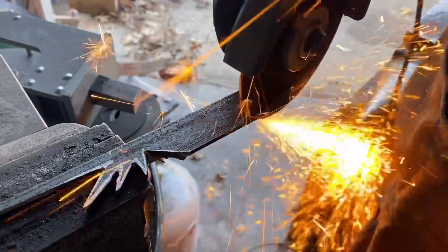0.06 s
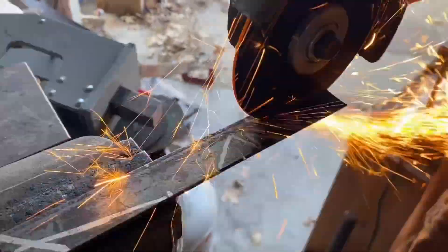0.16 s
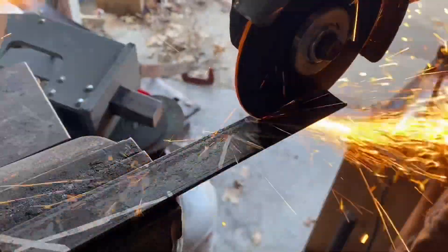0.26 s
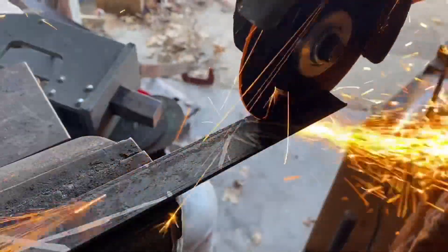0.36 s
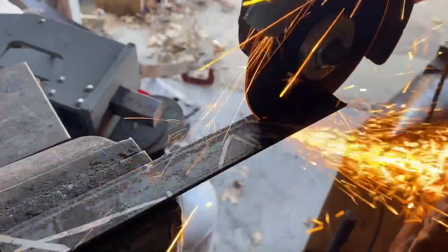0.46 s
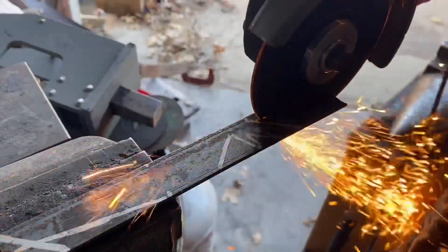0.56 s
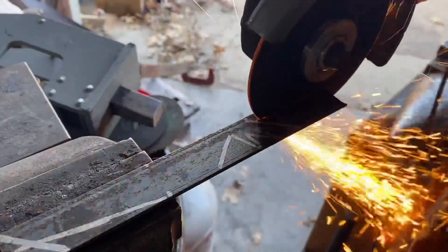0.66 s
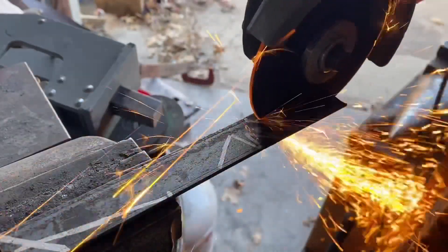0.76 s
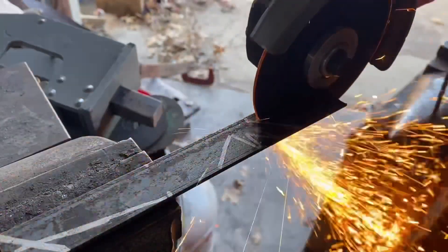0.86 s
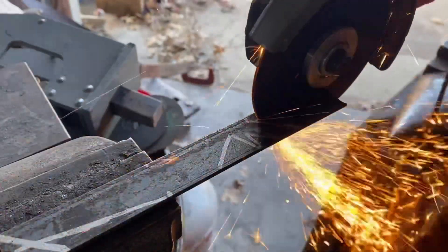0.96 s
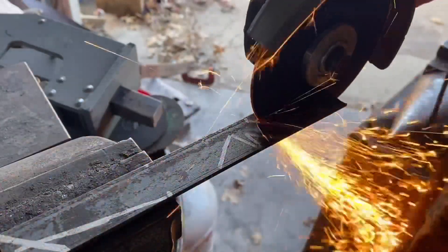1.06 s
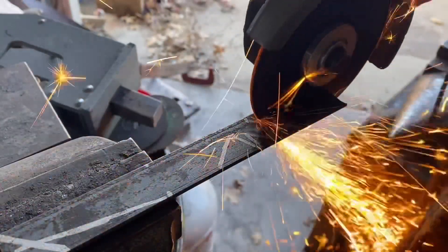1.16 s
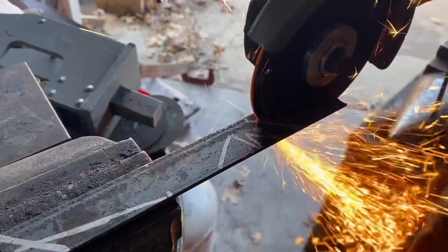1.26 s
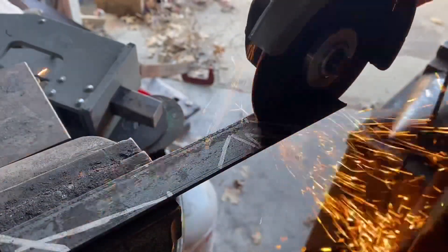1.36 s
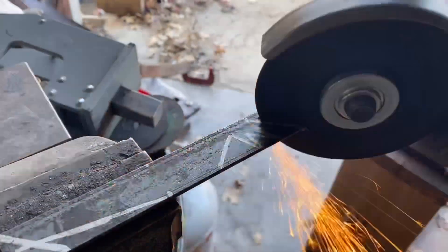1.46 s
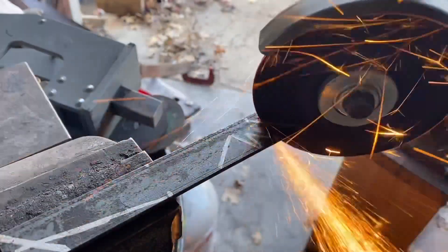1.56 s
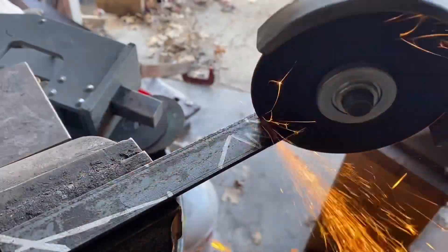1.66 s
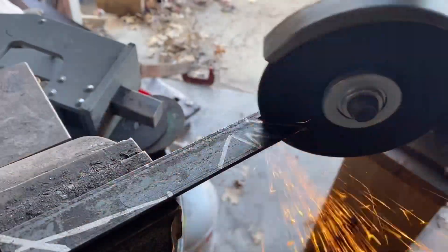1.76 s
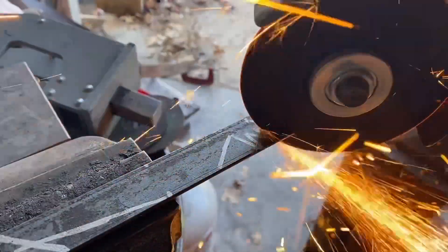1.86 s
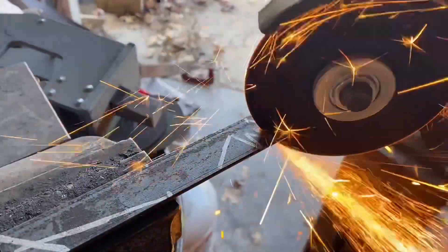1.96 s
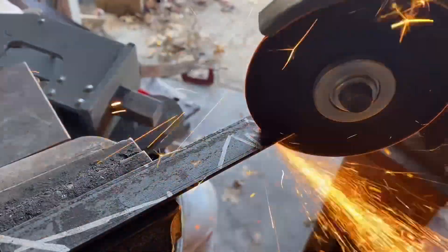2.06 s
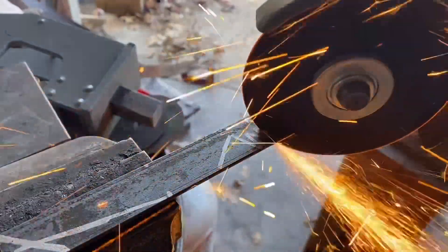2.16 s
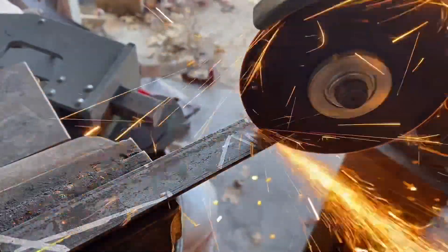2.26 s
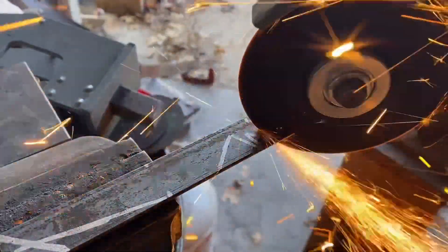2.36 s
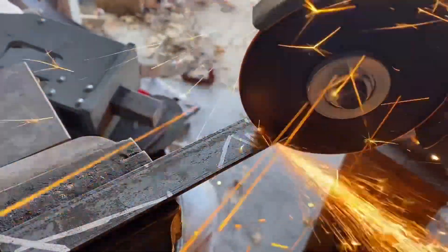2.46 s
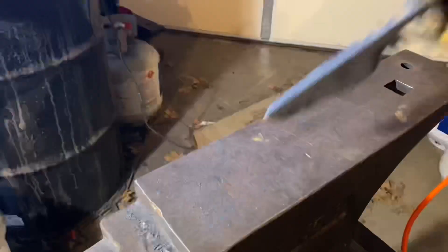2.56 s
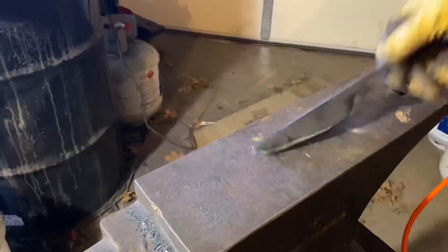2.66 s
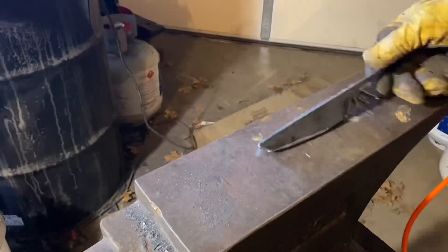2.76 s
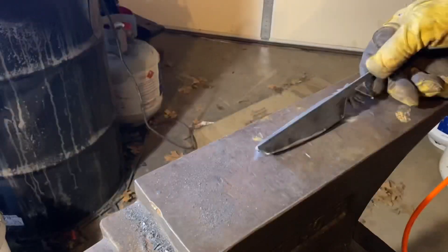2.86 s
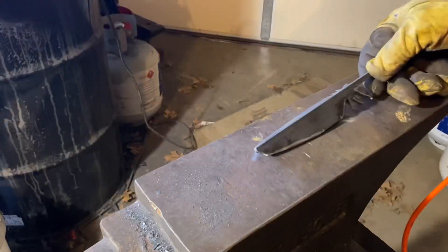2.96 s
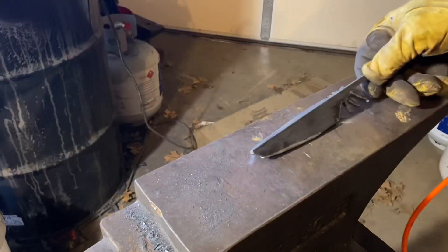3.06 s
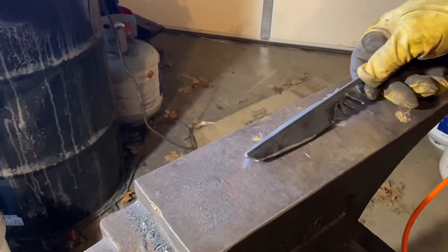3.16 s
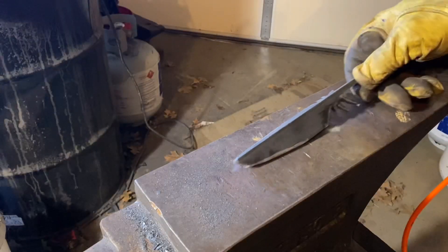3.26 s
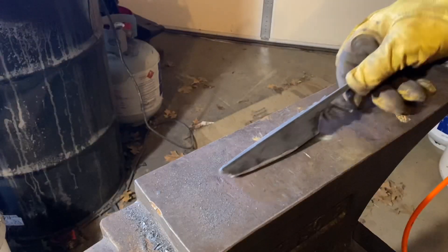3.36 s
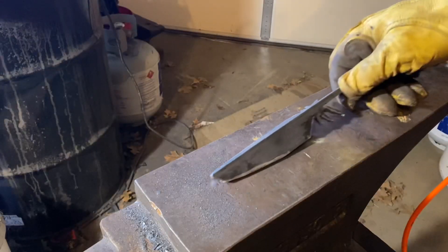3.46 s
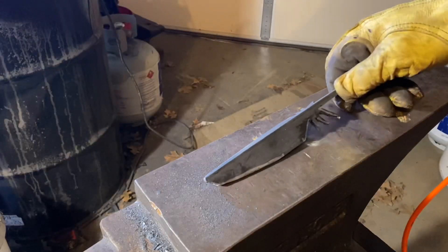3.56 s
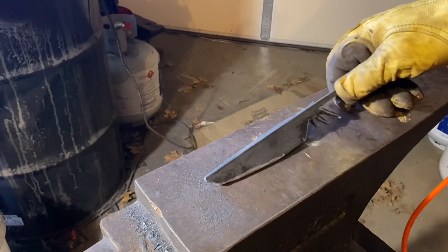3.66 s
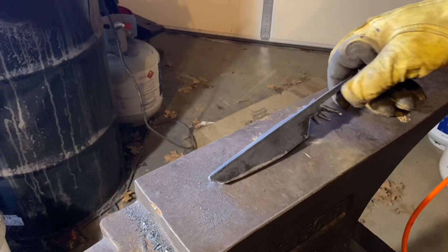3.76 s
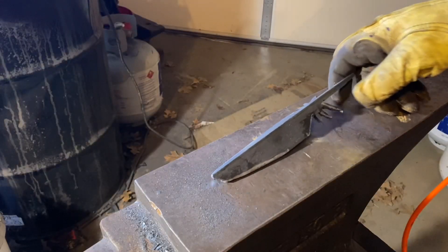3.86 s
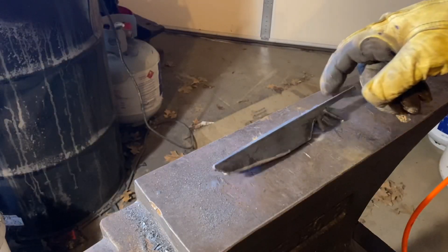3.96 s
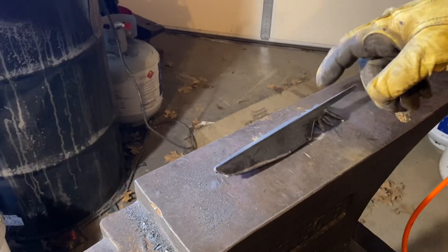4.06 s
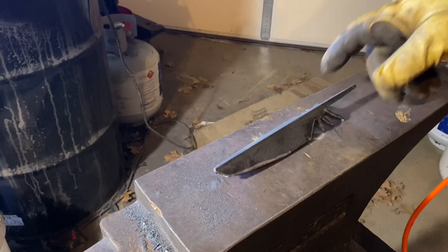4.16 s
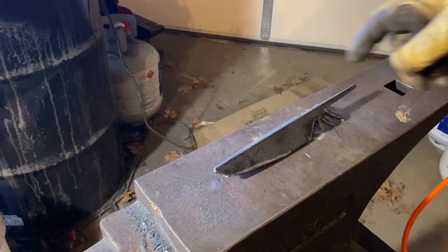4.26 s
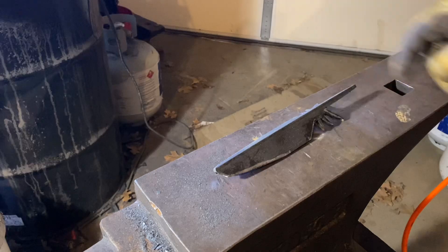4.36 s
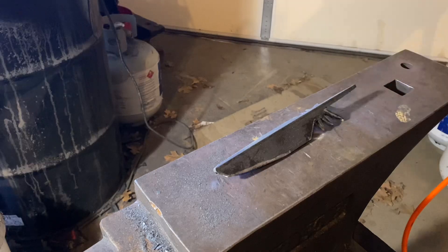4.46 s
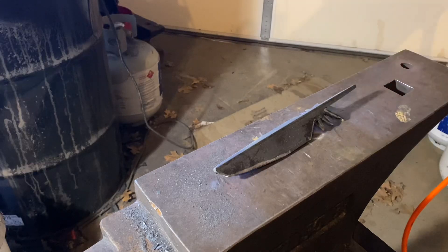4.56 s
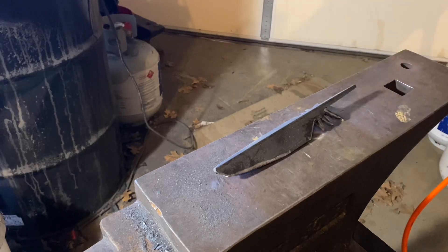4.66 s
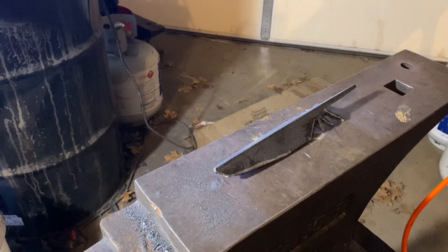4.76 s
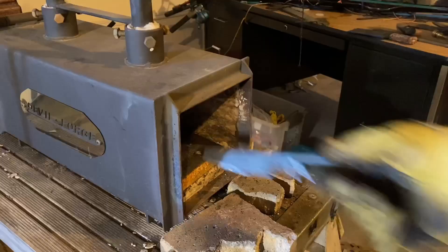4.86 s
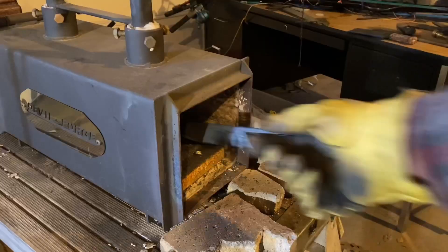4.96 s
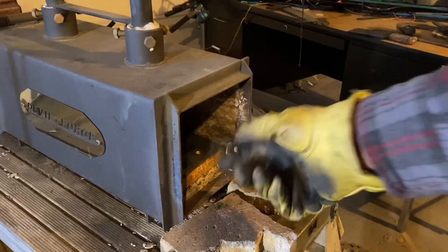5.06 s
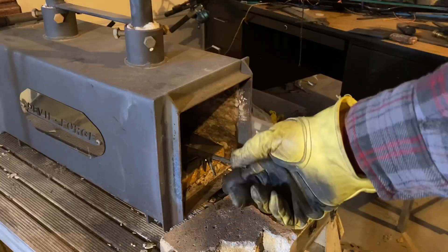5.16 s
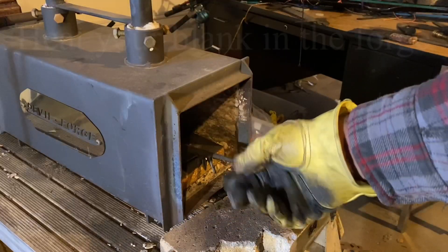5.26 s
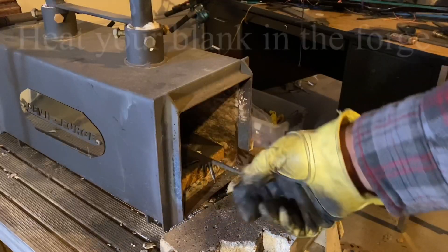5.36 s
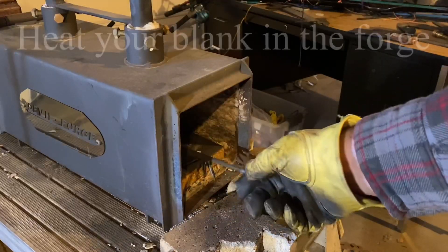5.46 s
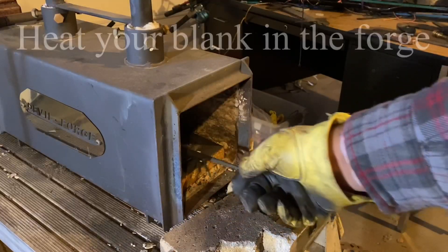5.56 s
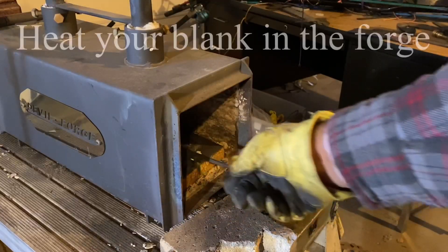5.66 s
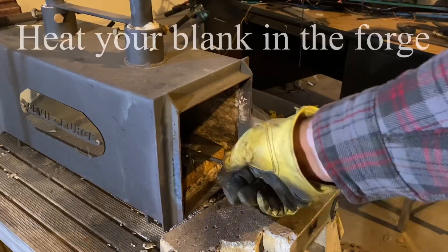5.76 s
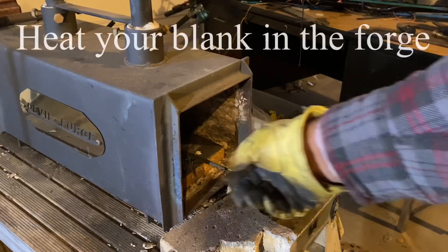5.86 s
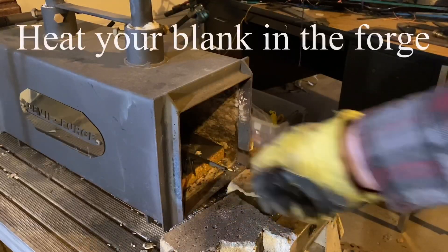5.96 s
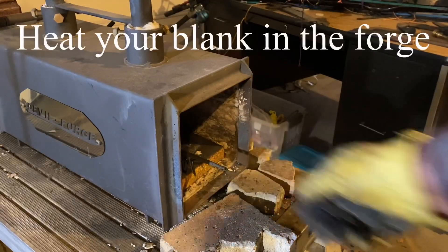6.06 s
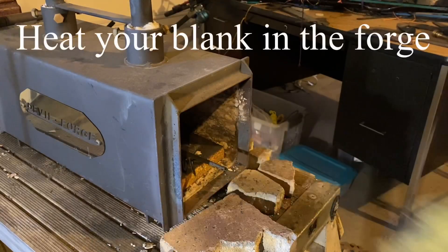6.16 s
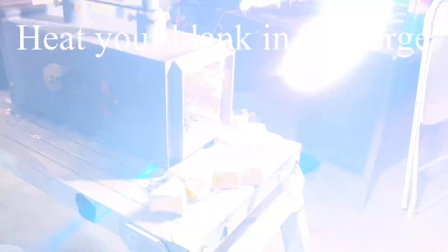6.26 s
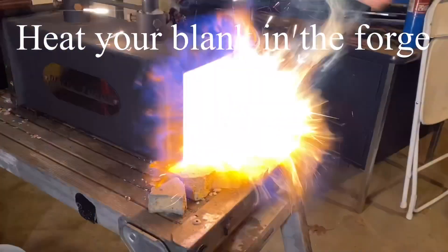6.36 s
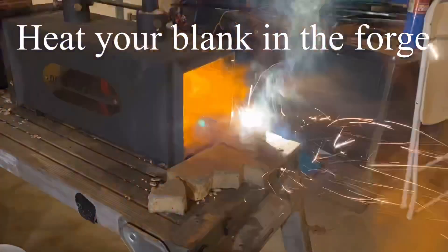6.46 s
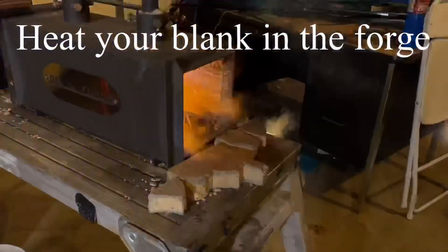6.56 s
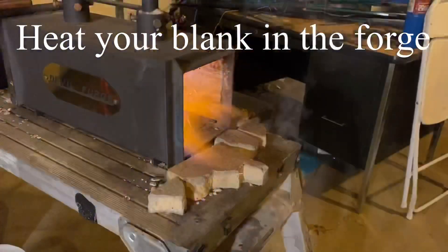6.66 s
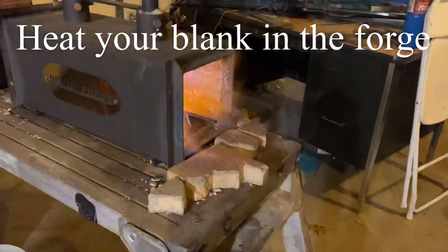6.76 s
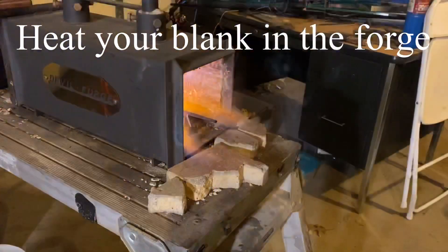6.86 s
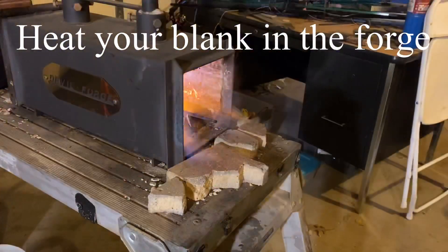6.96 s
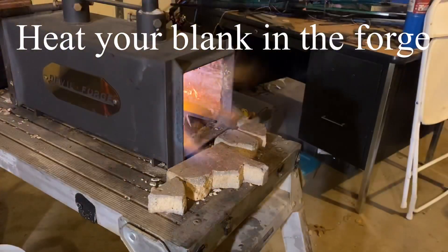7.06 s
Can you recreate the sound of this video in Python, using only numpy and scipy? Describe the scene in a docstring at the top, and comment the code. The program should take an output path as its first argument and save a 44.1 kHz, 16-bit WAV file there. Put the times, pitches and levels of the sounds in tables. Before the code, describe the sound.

Loud, hissing grinding and a high gear whine come in four quick stretches as an angle grinder bites steel nearby. The workshop falls to a low hum, and a steel blade rings twice on an anvil with a faint scrape between. The blade is laid on firebricks, where it clunks and rocks. A brief hiss of gas bursts into a sharp whoomp, and the forge burns with a deep roar.

```python
"""Grinding and forging in a metal workshop

An angle grinder makes four cuts in a clamped steel bar: grit bites, gears whine, the bar sings.
Over the low hum of the shop a knife blank is set on an anvil, slid and dropped flat, ringing as it lands.
It is laid on the bricks of a gas forge, where it rocks and scrapes. The gas hisses, lights and roars.
Each short passage fades in and out."""
import sys
import numpy as np
from scipy import signal
from scipy.fft import rfft, irfft, next_fast_len
from scipy.io import wavfile
from scipy.ndimage import uniform_filter1d, map_coordinates

SR = 44100
rng = np.random.default_rng(int(sys.argv[2]) if len(sys.argv) > 2 else 0)


def generate_wav(sig):
    """Save sig (samples, or channels by samples) to the path in sys.argv[1] as 16-bit PCM at SR."""
    pcm = np.round(np.clip(np.atleast_2d(sig).T, -1, 1) * 32767).astype(np.int16)
    wavfile.write(sys.argv[1], SR, pcm)


N = 313533

# A "colour" says how strong each pitch is compared with the others. A "mode" is one note an object
# rings at. A "decay" is the time a sound takes to fall by 60 dB.
# passages of sound: start/s, end/s, fade-in/s, fade-out/s
PASSAGES = [(-.1, 0.201, 0.14, 0.14), (0.21, 1.458, 0.16, 0.09), (1.491, 1.801, 0.14, 0.033),
            (1.856, 2.497, 0.14, 0.034), (2.56, 4.875, 0.11, 0.11), (4.935, 6.304, .22, 0.11),
            (6.308, 7.296, 0.095, .1)]
# how fast the disc spins, one list a cut: t/s, speed/(turns per s)
DISC_SPEEDS = [
    [(0, 151), (.21, 146)],
    [(.212, 94.5), (.44, 98), (.55, 101.5), (.72, 108), (.84, 119.6), (1, 124.6), (1.16, 130.5),
     (1.32, 133.7), (1.47, 135.5)],
    [(1.487, 172), (1.805, 172.6)],
    [(1.845, 115), (2.05, 112.2), (2.2, 111.1), (2.505, 112.8)],
]
# one row a cut: level/dB, gear whine/dB, shaft thrum/dB (the last two are added to the first)
CUT_LEVELS = [(-22.5, -32, -28), (-25.5, -5, -31), (-25.5, -20.5, -47.5), (-27, -6, -36)]
# colour of bar, disc and motor: f/Hz, then level/dB in each of the four cuts
CUT_COLOURS = [(58.6, -41.5, -26, -1, -29), (121, -33, -13.5, -12.5, -18.5), (296, -24.5, -17, -14, -24.5),
               (844, -18.5, -15.5, -10.5, -15), (1390, -19.5, -15, -15.5, -14.5),
               (2197, -17, -14, -9.5, -13), (3220, -16, -11.5, -10, -11), (3690, -10.5, 1.5, -4.5, 2.5),
               (4365, -8, -1.5, -7.5, -1), (5700, -4.5, -5, -5, -8.5), (7260, -6, -3.5, -9, -9),
               (12400, -7.5, -5.5, -4, -10.5), (18000, -9.5, -9, -5, -16)]
# share of each cut's noise that repeats every turn, 0-1
REPEAT_SHARES = [.4, .45, .25, .55]
# multiples of the disc speed that sing out, one list a cut
TONE_MULTIPLES = [
    [7, 34],
    [14, 40, 48],
    [23, 27, 29],
    [10, 12, 17, 38],
]
# strength of those tones at top speed, relative to each cut: level/dB
TONE_LEVELS = [-15, -17, -13, -13]
# modes of the clamped bar: f/Hz, width/Hz, level/dB relative to the grit
BAR_MODES = [(1067, 20, 12), (6350, 170, -11.5)]
# how alike left and right noise are: f/Hz, likeness 0-1
STEREO_LIKENESS = [(60, .995), (300, .94), (600, .8), (2500, .65), (5000, .8), (8200, .99)]
# gusts of air from the disc: t/s, level/dB, pitch drop/Hz
GUSTS = [(1.61, -33, 500), (1.671, -21.5, 626), (1.695, -24, 744), (1.731, -27, 500), (1.745, -28, 297)]
# background of the shop: start/s, end/s, level/dB
SHOP_SPANS = [(2.6, 2.95, -66.5), (3.0, 4.85, -55), (5.0, 6.3, -63.5)]
# its colour: f/Hz, level/dB
SHOP_COLOUR = [(30, -3), (90, 5), (170, -10), (300, -20), (3000, -40)]
# a motor somewhere in the shop: f/Hz, level/dB relative to the background
MOTOR_HUM = [(45.5, -6.5), (91, -3), (181, -10.5)]
# the blank is dragged: start/s, end/s, level/dB
SLIDES = [(2.6, 3.63, -58), (3.3, 3.37, -52), (3.8, 4.25, -57), (5.02, 5.84, -58.5)]
# colour of its scrape: f/Hz, level/dB
SCRAPE_COLOUR = [(300, 2), (900, 0), (2400, 2), (5000, -5.5), (8000, -6.5), (12000, -4.5), (15500, -7)]
# friction catches the mode nearest to f: start/s, end/s, f/Hz, level/dB
SQUEAKS = [(3.125, 3.4, 4694, -59), (3.333, 3.504, 6350, -55), (5.7, 5.898, 1470, -61)]
# modes of the blank and the anvil under it: f/Hz
STEEL_HZ = [1325, 1460, 1700, 1841, 2035, 2385, 3385, 3420, 4167, 4694, 5080, 5590, 6215, 6392, 6900, 7760,
            8295, 9840, 10575, 10700, 11330, 12010, 15050]
# the same modes: base decay/s, level/dB landing on edge, level/dB landing flat
STEEL_MODES = [(0.31, -22, -21.5), (0.16, -43, -33.5), (0.81, -58, -35.5), (0.88, -39, -60),
               (0.42, -27.5, -35.5), (0.11, -32, 0), (0.067, -7.5, -25), (0.3, 0, 2), (0.6, -49.5, -27),
               (0.55, -13, -9.5), (0.31, -17.5, -24), (0.18, -10.5, -16), (0.27, -29.5, -16.5),
               (0.3, -9, -19), (0.11, -24, -19), (0.062, -33.5, -27), (0.34, -7.5, -28), (0.12, -9, -15.5),
               (0.14, -27, -17), (0.075, -9.5, -26), (0.68, -59, -29.5), (0.11, -28.5, -28),
               (.2, -15.5, -49.5)]
# t/s, level/dB, flatness 0-1, settling/s, lasting ring/dB, chatter/dB, knock/dB, left over right/dB
LANDINGS = [(2.73, -9, 0.19, 0.0095, -8, -8, -55.5, 1.5), (4.047, -40.5, 0.42, 0.085, -1.5, -6, -54, 0.5),
            (4.083, -15.5, 0.98, 0.049, -6.5, -7.5, -49.5, 1),
            (4.183, -41.5, 0.92, 0.017, -5, -0.5, -79, -2.5), (4.245, -46, 1, 0.0082, 1.5, -3, -78, 1.5),
            (5.171, -11.5, 0.17, 0.024, -13, -0.5, -26, 2.5)]
# echo of the shop: f/Hz, decay/s
WALL_DECAYS = [(600, 0.22), (10000, 0.23)]
# the blank rocks on the bricks: t/s, knock level/dB
RATTLES = [(5.424, -28.5), (5.5006, -23.5), (5.518, -28.5), (5.5423, -27), (5.589, -32.5), (5.6234, -33),
           (5.665, -27.5), (5.6774, -24.5), (5.71, -29.5), (5.79, -27.5), (5.9507, -27.5), (5.9768, -29),
           (5.998, -31)]
# colour of its ring on brick: f/Hz, level/dB
RATTLE_COLOUR = [(1400, 12), (2400, 12), (3400, 10), (4170, -4), (4700, 7), (12000, 1)]
# it rubs the bricks: start/s, end/s, level/dB
BRICK_RUBS = [(5.62, 5.95, -51)]
# colour of that rumble: f/Hz, level/dB
RUB_COLOUR = [(100, -4), (300, 1), (900, -11.5), (2400, -45)]
# colour of the gas hiss: f/Hz, level/dB
HISS_COLOUR = [(1500, 1), (15500, 0.5)]
# colour of the fire's boom: f/Hz, level/dB
BOOM_COLOUR = [(30, -19.5), (66, 9), (85, 0), (140, 6.5)]
# modes of the forge chamber: f/Hz, width/Hz, level/dB
CHAMBER_MODES = [(165.6, 28, 5), (206, 37, 9), (283, 24.4, 11), (344.8, 31, -5)]
# colour of the flame: f/Hz, level/dB
FLAME_COLOUR = [(350, 2.5), (700, -2.5), (1500, -15), (3000, -28), (5000, -41)]
# boom, roar, flame: unlit/dB, flare peak t/s, flare/dB, flare decay/s, burning/dB, change once full/dB
FIRE_LAYERS = [(-53.5, 6.474, -8, 0.13, -29, -1), (-55, 6.455, -10, 0.33, -25, 12.5),
               (-45, 6.45, -13.5, 0.41, -34.5, 10)]
# pitches where left and right swap between in step and opposed: f/Hz
PHASE_FLIPS = [8050, 10150, 12200, 14350]

GEAR_TEETH, RIM_HARMONICS = 37, 128
BRICKS_START_S, FORGE_START_S = PASSAGES[-2][0], PASSAGES[-1][0]
ANVIL_HZ, BRICKS_HZ = (220.3, 510), (142, 343.8)  # dull knock of what the blank lands on
CATCH_S, SNAP_S, FIRE_GROWS_S = 6.4, 6.4835, 0.32
TIME = np.arange(N) / SR


def amp(db):
    """Turn decibels into a gain."""
    return 10 ** (np.asarray(db) / 20)


def sine(cycles):
    """A pure tone, given the cycles gone by."""
    return np.sin(2 * np.pi * cycles)


def unit(x):
    """Scale to an average power of 1."""
    return x / np.sqrt(np.mean(x ** 2) + 1e-20)


def along(points, hz):
    """Read between (f/Hz, value) points on a scale of octaves."""
    f, values = np.transpose(points)
    return np.interp(np.log(hz + 1), np.log(f + 1), values)


def colour(points):
    """Gain by pitch, falling steeply beyond the first and last point."""
    closed = [(points[0][0] / 2, -70), *points, (points[-1][0] * 2, -70)]
    return lambda hz: amp(along(closed, hz))


def resonance(f, hz, width):
    """Response of one mode, with gain 1 at its centre."""
    return 1j * f * width / (hz * hz - f * f + 1j * f * width)


def wobble(rate):
    """A smooth random curve through rate points a second."""
    return map_coordinates(rng.standard_normal(int(N * rate / SR) + 4), [TIME * rate])


def filtered(x, response):
    """Change the strength and phase of each pitch in x."""
    n = x.shape[-1]
    size = next_fast_len(n + 8192)
    return irfft(rfft(x, size) * response(np.fft.rfftfreq(size, 1 / SR)), size)[..., :n]


def dull_noise(t, hz):
    """Noise softened above hz."""
    return signal.sosfilt(signal.butter(2, hz, fs=SR, output="sos"), rng.standard_normal(len(t)))


def spread(pair, response):
    """Colour two unrelated signals and blend them into a partly alike left and right."""
    def blend(hz):
        angle = np.arccos(along(STEREO_LIKENESS, hz)) / 2
        return response(hz) * [np.cos(angle), np.sin(angle)]
    mid, side = filtered(pair, blend)
    return unit(np.array([mid + side, mid - side]))


def rush(response, throb_db, rate):
    """Stereo noise whose level throbs at random."""
    return spread(rng.standard_normal((2, N)) * amp(throb_db * wobble(rate)), response)


def held(spans, rise, fall):
    """Gain that holds each span's level, rising before and falling after in dB per second."""
    return sum(amp(db - rise * np.maximum(start - TIME, 0) - fall * np.maximum(TIME - end, 0))
               for start, end, db in spans)


def rim(turns, weights, life):
    """Random bumps round a wheel, passed once a turn; they wear into new ones every life turns."""
    shape, size = (2, int(turns[-1] / life) + 4, RIM_HARMONICS), 8 * RIM_HARMONICS
    bumps = irfft(weights * (rng.standard_normal(shape) + 1j * rng.standard_normal(shape)), size)
    place = [turns / life, turns % 1 * size]
    return unit(np.array([map_coordinates(side, place, order=1, mode="grid-wrap") for side in bumps]))


def bite(turns, share, cut_colour):
    """Grit bites the bar and makes it sing; the off-centre disc presses harder once a turn."""
    fresh = rng.standard_normal((2, len(turns))) * (1 + 0.28 * np.cos(2 * np.pi * turns))
    repeating = rim(turns, np.arange(RIM_HARMONICS) > 0, life=20)
    grit = np.sqrt(share) * repeating + np.sqrt(1 - share) * fresh
    bar = lambda f: 1 + sum(amp(db) * resonance(f, hz, width) for hz, width, db in BAR_MODES)
    return spread(grit, lambda f: cut_colour(f) * bar(f))


def gears(turns, speed_share, gate, db):
    """Meshing teeth whine and rasp; the clean note is strongest near top speed."""
    offset = np.arange(RIM_HARMONICS) - GEAR_TEETH
    rasp = rim(turns, np.exp(-(offset / 5) ** 2), life=2.8)
    side_tones = rim(turns, 1 / (1 + offset ** 2), life=4)[0]
    free = np.maximum(0.2, 0.5 + 0.5 * np.tanh((speed_share - 0.865) / 0.015))
    clean = free * (1 + 0.38 * wobble(30)[gate]) * sine(GEAR_TEETH * turns)
    whine = clean + 0.45 * side_tones + 0.4 * sine(2 * GEAR_TEETH * turns)
    return amp(db) * whine + amp(-12 + db / 2) * rasp


def grinder():
    """Four cuts whose tones all follow the speed of the disc."""
    out = np.zeros((2, N))
    colour_hz, *colour_db = np.transpose(CUT_COLOURS)
    bar_hz, bar_width, _ = BAR_MODES[0]
    for cut, (cut_db, gear_db, thrum_db) in enumerate(CUT_LEVELS):
        times, speeds = np.transpose(DISC_SPEEDS[cut])
        gate = (TIME >= times[0]) & (TIME <= times[-1])
        speed = np.interp(TIME[gate], times, speeds)
        speed_share = speed / speed.max()
        turns = np.cumsum(speed) / SR
        grit = bite(turns, REPEAT_SHARES[cut], colour(list(zip(colour_hz, colour_db[cut]))))
        whine = gears(turns, speed_share, gate, gear_db)
        # the bar howls when nine times the disc speed crosses its low mode
        howl = amp(-13) * abs(resonance(9 * speed, bar_hz, 2 * bar_width)) ** 2 * sine(9 * turns)
        multiples = TONE_MULTIPLES[cut]
        tones = sum(np.sqrt(k / max(multiples)) * (1 + 0.35 * wobble(25)[gate]) * sine(k * turns)
                    for k in multiples)
        tones *= amp(TONE_LEVELS[cut]) * speed_share ** 12  # they come out as the disc runs free
        thrum = amp(thrum_db) * (sine(turns) + 0.69 * sine(2 * turns))
        pressure = amp(cut_db + 0.8 * wobble(9)[gate])
        out[:, gate] = pressure * (grit + whine + howl + tones + thrum)
    return out * amp([[0.6], [-0.6]])


def gusts():
    """Each gust from the disc is a ragged thump that slides down in pitch."""
    out, t = np.zeros(N + SR), np.arange(SR // 10) / SR
    for start, db, drop_hz in GUSTS:
        hz = 60 + drop_hz * np.exp(-t / 0.0046)
        ragged = 1 + 0.83 * wobble(526)[:len(t)]
        envelope = amp(db - 60 * t / 0.097) * (1 - np.exp(-t / 0.00017))
        out[round(start * SR):][:len(t)] += envelope * ragged * sine(np.cumsum(hz) / SR)
    return out[:N]


def shop():
    """Low background noise, with a wavering motor hum until the blank goes to the bricks."""
    hum = sum(amp(db + 2.5 * wobble(6)) * sine(hz * TIME + 0.12 * wobble(6)) for hz, db in MOTOR_HUM)
    rumble = rush(colour(SHOP_COLOUR), throb_db=0, rate=10)
    return held(SHOP_SPANS, rise=200.5, fall=300) * (rumble + hum * (TIME < BRICKS_START_S))


def sliding():
    """The dragged blank hisses through its modes, squeaks, and rumbles on the bricks."""
    modes = lambda f: 0.5 + sum(amp(edge_db / 3 + 10) * resonance(f, hz, 15)
                                for hz, (_, edge_db, _) in zip(STEEL_HZ, STEEL_MODES))
    scrape = rush(lambda f: colour(SCRAPE_COLOUR)(f) * modes(f), throb_db=3.5, rate=25)
    out = held(SLIDES, rise=189, fall=160.5) * scrape
    for start, end, near_hz, db in SQUEAKS:
        mode_hz = min(STEEL_HZ, key=lambda hz: abs(hz - near_hz))
        envelope = held([(start, end, db)], rise=250, fall=118.5) * amp(3 * wobble(30))
        out += envelope * sine(mode_hz * TIME)
    rumble = rush(colour(RUB_COLOUR), throb_db=4, rate=200)
    return out + held(BRICK_RUBS, rise=105, fall=137) * rumble


def steel_ring(levels_db, t, stretch, longest_s, stutter, flat=0, loose=1, lasting_db=-60):
    """Struck steel rings; loose contact makes its short modes stutter, and settling chokes them."""
    hz = np.c_[STEEL_HZ]
    decay = np.minimum(stretch * np.array(STEEL_MODES)[:, :1], longest_s)
    decay *= 1 - 0.75 * flat * (hz == 4694)  # lying flat damps this one mode
    jitter = np.array([map_coordinates(row, [t * 78], order=1)
                       for row in rng.standard_normal((len(hz), 80))])
    flutter = 1 + stutter * (1 - np.exp(-t / 0.054)) * (decay < 0.6) * jitter
    low_and_short = (hz < 4000) & (decay < 0.7)
    choke = np.where(decay > 1, 1, amp(lasting_db - 8 * low_and_short) + loose)
    return np.sum(amp(levels_db - 60 * t / decay) * flutter * choke * sine(hz * t), 0)


def landings():
    """The blank knocks on anvil or brick, rings and chatters until it settles, then rings on."""
    out, t = np.zeros((2, N + SR)), np.arange(SR) / SR
    edge_db, flat_db = np.transpose(STEEL_MODES)[1:, :, None]
    treble_only = signal.butter(4, 1700, "high", fs=SR, output="sos")
    for start, db, flat, settle_s, lasting_db, chatter_db, knock_db, pan_db in LANDINGS:
        levels_db = edge_db + flat * (flat_db - edge_db) + rng.normal(0, 0.33, edge_db.shape)
        loose = np.exp(-(t / settle_s) ** 3)
        ring = steel_ring(levels_db, t, stretch=1.39, longest_s=3, stutter=0.57,
                          flat=flat, loose=loose, lasting_db=lasting_db)
        grit = signal.sosfilt(treble_only, dull_noise(t, hz=6500))
        chatter = amp(chatter_db - 60 * t / (0.03 + 2.2 * settle_s)) * (loose + 0.14) * grit
        low_hz, high_hz = BRICKS_HZ if start > BRICKS_START_S else ANVIL_HZ
        thud = 6 * amp(-60 * t / 0.08) * dull_noise(t, hz=900)
        knock = amp(knock_db - 60 * t / 0.23) * (sine(low_hz * t) + 0.5 * sine(high_hz * t) + thud)
        blow = amp(db) * (ring + chatter) * (1 - np.exp(-t / 0.00025)) + knock
        out[:, round(start * SR):][:, :len(t)] += blow * amp([[pan_db / 2], [-pan_db / 2]])
    return out[:, :N]


def wall_echo(x):
    """The walls answer with a short wash of sound that dies away."""
    hz, t, noise = signal.stft(rng.standard_normal((2, SR // 2)), SR, nperseg=256)
    tail = signal.istft(noise * amp(-60 * t / along(WALL_DECAYS, hz)[:, None]), SR, nperseg=256)[1]
    return signal.fftconvolve(x, tail / np.linalg.norm(tail[0]), axes=1)[:, :N]


def left_first(hz):
    """On the bricks the steel is heard slightly earlier on the left, up to about 6500 Hz."""
    lead_radians = 1.4 * hz / 3500 * np.exp(-(hz / 6500) ** 6)
    return np.exp(0.5j * np.array([lead_radians, -lead_radians]))


def rattles():
    """The blank rocks on the bricks: gritty knocks, each with its own choked ring."""
    out, t = np.zeros(N + SR), np.arange(SR // 3) / SR
    for start, db in RATTLES:
        levels_db = along(RATTLE_COLOUR, np.c_[STEEL_HZ]) + rng.normal(0, 4, (len(STEEL_HZ), 1))
        ring = steel_ring(levels_db, t, stretch=1, longest_s=0.11, stutter=0.9)
        knock = amp(-60 * t / 0.045) * dull_noise(t, hz=790)
        grit = 0.16 * amp(-60 * t / 0.043) * dull_noise(t, hz=2780)
        contact = amp(-21 + 1.62 * db) * ring + amp(db) * (knock + grit)  # hard knocks ring more
        out[round(start * SR):][:len(t)] += contact * (1 - np.exp(-t / 0.0015))
    return out[:N]


def forge():
    """Gas hisses, lights with a boom and a snap, and the fire takes hold."""
    boom = rush(colour(BOOM_COLOUR), throb_db=2, rate=19)
    roar = chamber_roar()
    flame = rush(colour(FLAME_COLOUR), throb_db=1.2, rate=110)
    hiss_db = np.interp(TIME, [SNAP_S - 0.02, SNAP_S + 0.03], [-36.5, -49.5])
    fire = amp(hiss_db) * rush(colour(HISS_COLOUR), throb_db=0.5, rate=30)
    grown = np.clip((TIME - SNAP_S) / FIRE_GROWS_S, 0, 1)
    for layer, row in zip([boom, roar, flame], FIRE_LAYERS):
        unlit_db, peak_s, flare_db, decay, burning_db, change_db = row
        catch = np.clip((TIME - CATCH_S) / (peak_s - CATCH_S), 0, 1) ** 1.4
        flare = amp(flare_db - 60 * np.maximum(TIME - peak_s, 0) / decay)
        burning = amp(burning_db + change_db * grown)
        fire += np.sqrt(amp(unlit_db) ** 2 + catch ** 2 * (flare ** 2 + burning ** 2)) * layer
    snap_age = np.clip(TIME - SNAP_S, 0, 1) / 0.00019
    snap = amp(-4.5) * (snap_age > 0) * (1 - snap_age) * np.exp(-snap_age)
    return (TIME > FORGE_START_S) * fire * amp([[-1.2], [1.2]]) + snap


def chamber_roar():
    """The flame drives the chamber's modes and holds them at a nearly even strength."""
    chamber = lambda f: sum(amp(db) * resonance(f, hz, width) ** 2 for hz, width, db in CHAMBER_MODES)
    roar = rush(chamber, throb_db=2.5, rate=52)
    power = uniform_filter1d(np.mean(roar ** 2, 0), size=3000)
    return roar / np.sqrt(np.abs(power))


def scene():
    """Mix the sources and fade each passage in and out; only the struck steel echoes."""
    steel = landings() + rattles()
    on_bricks = TIME > BRICKS_START_S
    steel = steel * ~on_bricks + filtered(steel * on_bricks, left_first)
    fades = sum(np.clip(np.minimum((TIME - start) / rise, (end - TIME) / fall), 0, 1) ** 1.46
                for start, end, rise, fall in PASSAGES)
    return fades * (grinder() + gusts() + steel + amp(-6) * wall_echo(steel) + sliding() + shop() + forge())


def record(dry):
    """Round off the peaks, set left against right in two treble bands, and cut the highest treble."""
    rounded = dry / (1 + np.abs(dry / 0.95) ** 6) ** (1 / 6)

    def treble(hz):
        angle = np.pi / 4 * sum(1 + np.tanh((hz - flip_hz) / 220) for flip_hz in PHASE_FLIPS)
        return np.exp(1j * np.array([-angle, angle])) * (hz < 15900)
    return filtered(rounded, treble)


dry = scene()
out = record(dry)
generate_wav(out)
```